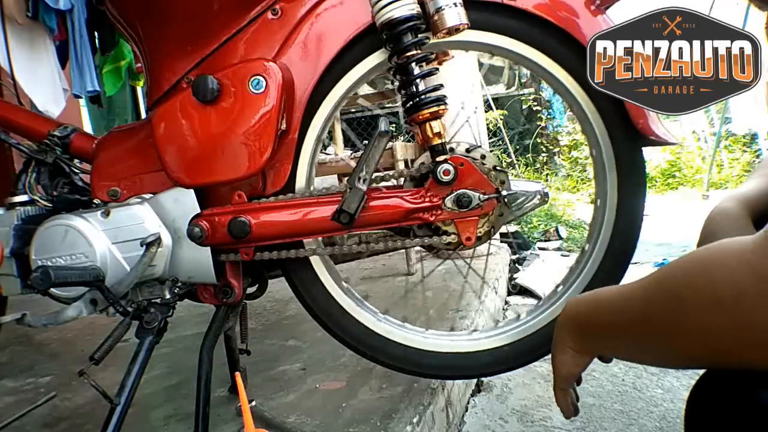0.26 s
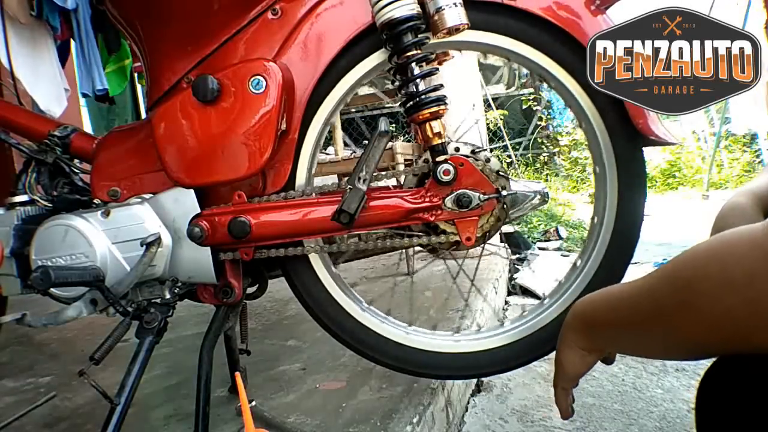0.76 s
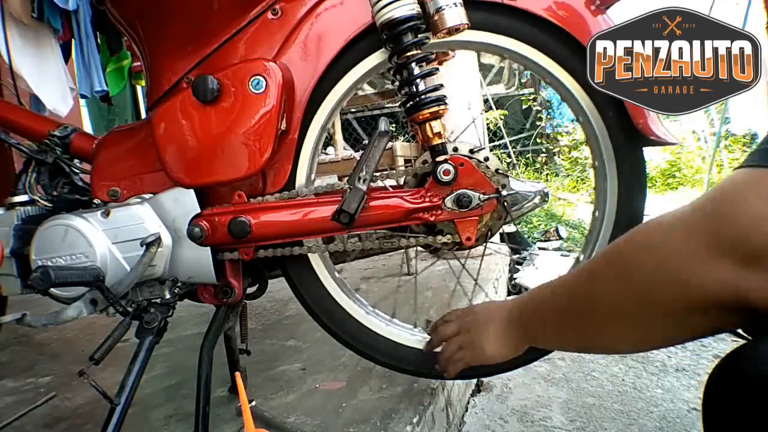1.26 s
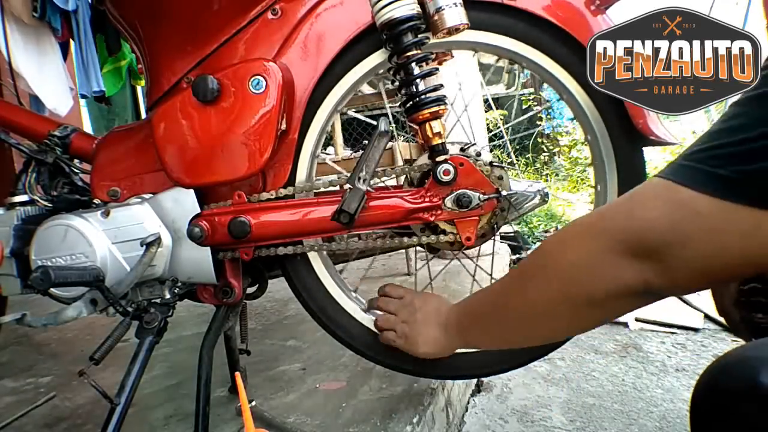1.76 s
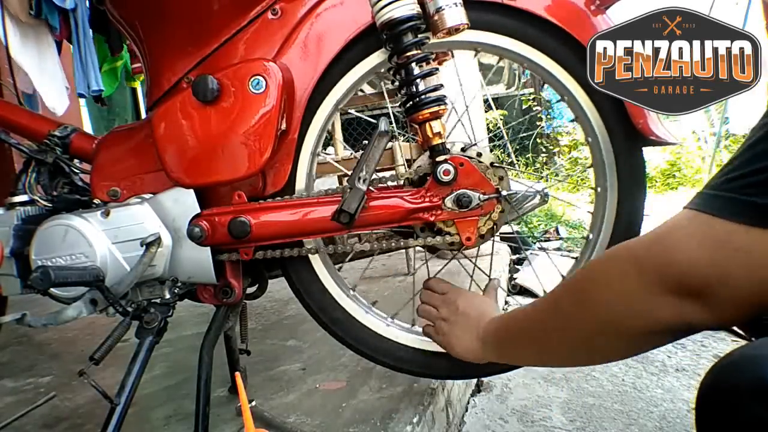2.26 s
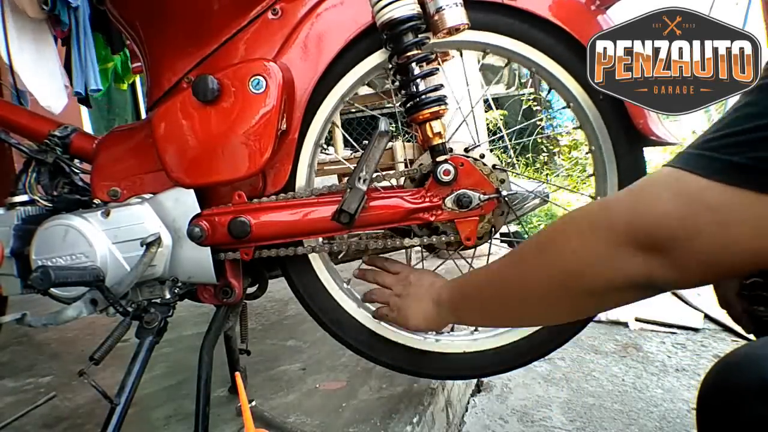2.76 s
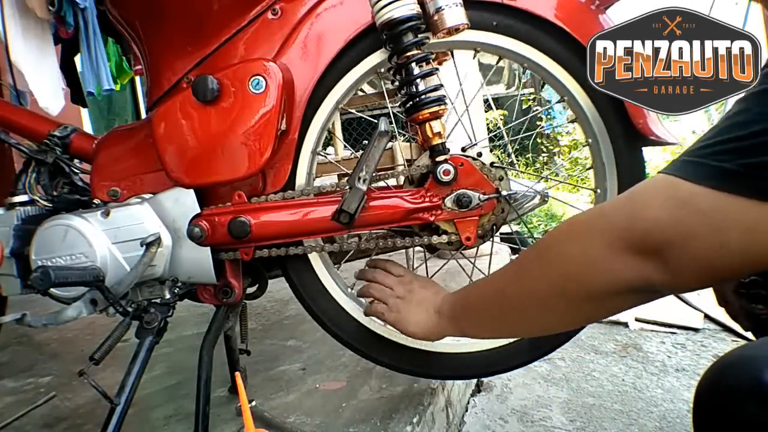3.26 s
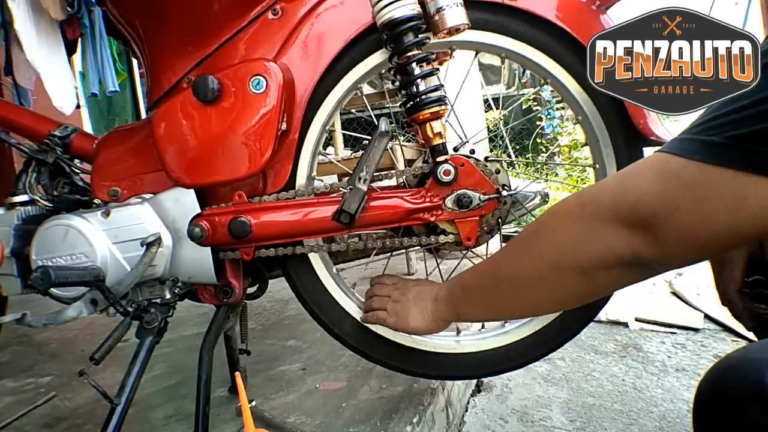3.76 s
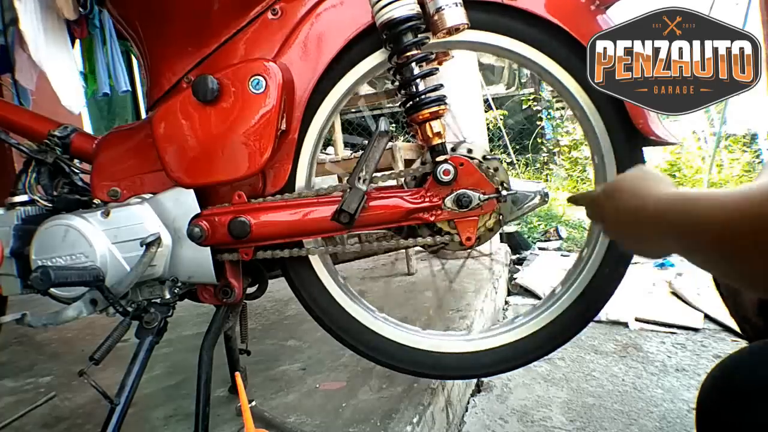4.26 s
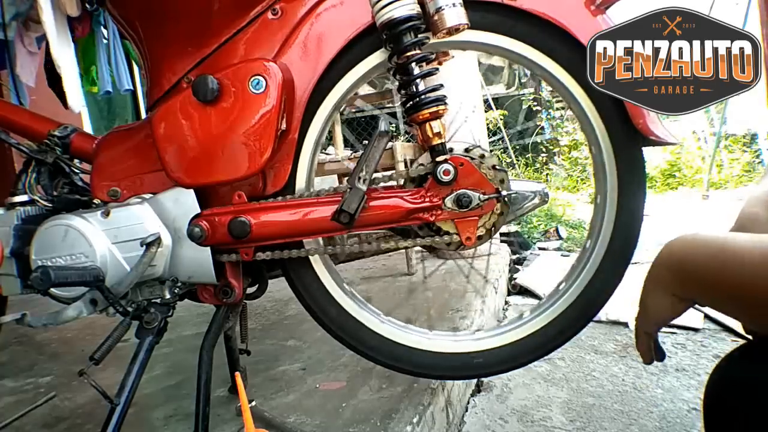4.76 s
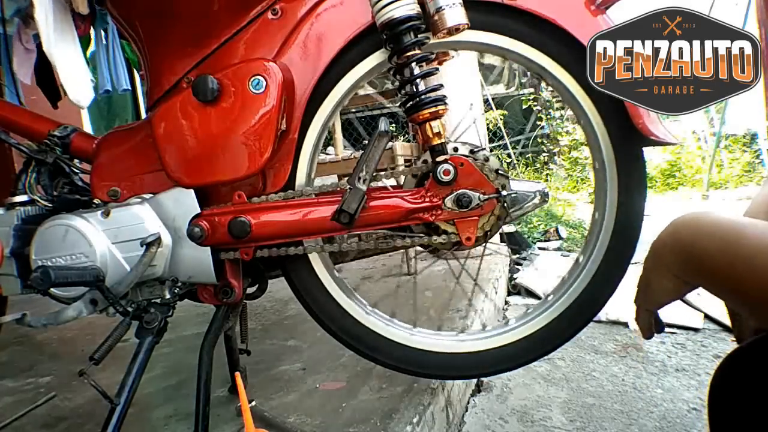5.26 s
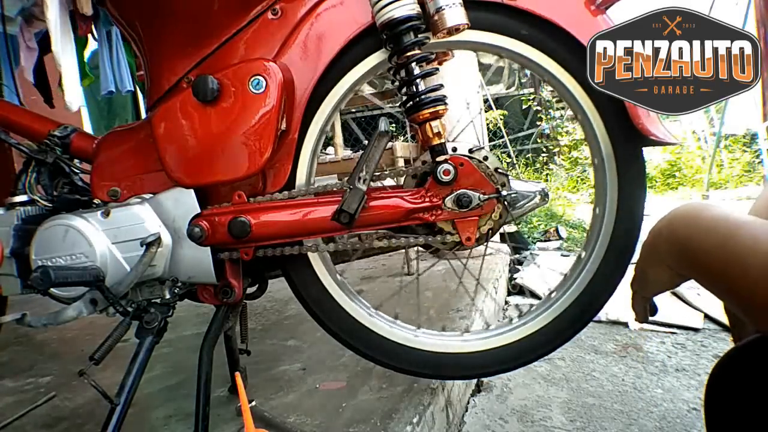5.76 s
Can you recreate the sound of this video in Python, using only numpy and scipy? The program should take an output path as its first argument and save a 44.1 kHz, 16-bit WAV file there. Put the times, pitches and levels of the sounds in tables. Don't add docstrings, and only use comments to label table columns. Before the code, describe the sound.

Hand-turned motorcycle wheel: light chain knocks and ticks, three loud bright snaps, a brief low wind gust, then denser clinking under an open roof.

```python
import sys
import numpy as np
from scipy import signal
from scipy.fft import rfft, irfft
from scipy.io import wavfile
from scipy.ndimage import uniform_filter1d

SR = 44100
rng = np.random.default_rng(int(sys.argv[2]) if len(sys.argv) > 2 else 0)


def materialize(psi):
    bounded = np.clip(np.atleast_2d(psi).T, -1, 1)
    quanta = np.round(bounded * 32767).astype(np.int16)
    wavfile.write(sys.argv[1], SR, quanta)


def level_to_linear(level):
    exponent = np.asarray(level, float) / 20
    return 10 ** exponent


N = 265923
SECONDS = np.arange(N) / SR
GRID_HZ = np.maximum(np.arange(2049) * SR / 4096, 1)
SIDES = np.array([[.5], [-.5]])
PATHS = np.array([[.5], [-.5], [0]])

# (frequency [Hz], level [dB], decay T60 [s])
GUARD_MODES = [(597.4, 5, 0.12), (683, -1.5, 0.1), (791, 8.5, 0.16), (950, -2, 0.1), (1034, -2.5, 0.011),
               (1150, 8.5, 0.085), (1061, 8.5, 0.077), (1370, -12.5, 0.0052), (1338, 4, 0.12),
               (1474, 9.5, 0.063), (1230, -6, 0.044)]
# (frequency [Hz], level [dB], decay T60 [s])
ARM_MODES = [(1720, 1.5, 0.026), (1820, -4, 0.126), (2085, 3.5, 0.041), (2225, -16.5, 0.082),
             (2270, -0.5, 0.01), (2900, -16.5, 0.042), (2910, -2, 0.068), (3240, -2, 0.033),
             (3870, -7, 0.018), (4920, -10.5, 0.0072)]


def rms_one(x):
    return x / np.sqrt(np.mean(x ** 2) + 1e-20)


def in_time(rows):
    s, level = np.transpose(rows)
    return np.interp(SECONDS, s, level)


def at_hz(points, hz):
    table_hz, values = np.array(points).T
    return np.interp(np.log(hz), np.log(table_hz), values)


def band(x, low_hz, high_hz):
    return signal.sosfilt(signal.butter(2, [low_hz, high_hz], "band", fs=SR, output="sos"), x)


def drift(rate):
    r = np.exp(-80 * np.pi * rate / SR)
    white = rng.standard_normal(N // 40 + 2002)
    slow = signal.lfilter([1], [1, -2 * r, r * r], white)[2000:]
    return np.interp(np.arange(N) / 40, np.arange(len(slow)), rms_one(slow))


def swells(rows, rest_db, rise_db_per_s, fall_db_per_s):
    start, held, db = np.transpose(rows)[:, :, None]
    before = np.maximum(start - SECONDS, 0)
    after = np.maximum(SECONDS - start - held, 0)
    level = db - rise_db_per_s * before - fall_db_per_s * after
    return np.maximum(level.max(axis=0), rest_db)


def add(out, s, sound):
    i = max(round(s * SR), 0)
    out[:, i:i + sound.shape[1]] += sound[:, :N - i]


def causal(db):
    fold = irfft(db * np.log(10) / 20, axis=-1)
    fold[..., 1:2048] *= 2
    fold[..., 2049:] = 0
    return irfft(np.exp(rfft(fold, axis=-1)), axis=-1)


def strike(colour_db, peak_db, pan_db, rattle_ms, per_s, rise_ms):
    # (frequency [Hz], left-right difference [dB])
    port_bias = [(700, -1), (1300, -1), (2400, -10), (4400, -7), (8300, -9), (11000, -1), (15000, -4)]
    right_lag = 4.7
    ms = np.arange(2400) * 1000 / SR
    swell = (1 - np.exp(-ms / rise_ms)) * np.exp(-ms / max(rattle_ms, .3))
    chance = rng.random((3, len(ms)))
    touching = (chance[0] < per_s / SR) * swell
    left = touching * (2 * chance[1] - 1)
    right = left + .6 * touching * (2 * chance[2] - 1)
    first = round(rise_ms * SR / 2000)
    left[first] = right[first] = .4
    lag = np.exp(-2j * np.pi * np.arange(1201) / len(ms) * right_lag)
    contacts = np.array([left, irfft(rfft(right) * lag), 1.0 * (ms == 0)])
    power = uniform_filter1d(np.abs(rfft(contacts, 4096)) ** 2, size=15)
    ripple_db = 10 * np.log10(power + 1e-9)
    rings = causal(colour_db - ripple_db + PATHS * at_hz(port_bias, GRID_HZ))
    sound = signal.fftconvolve(rings, contacts, axes=1)
    sound = sound / np.sqrt(np.mean(sound ** 2, axis=1, keepdims=True))
    return sound * level_to_linear(peak_db + pan_db * PATHS) / np.abs(sound[:2]).max()


def engine_db():
    # (start [s], held [s], level [dB])
    loads = [
        (-.02, 0.015, -41),
        (.27, 0.25, -47),
        (.7, 0.0091, -53.5),
        (.85, 0.0065, -48.5),
        (1.01, 0.42, -40),
        (1.9, 0.0058, -52),
        (2.12, 0.03, -59),
    ]
    return swells(loads, rest_db=-67.5, rise_db_per_s=279, fall_db_per_s=152)


def drone():
    order_hz, shift_s, shift_hz = 89.8, 1.9, 22
    hz = order_hz + shift_hz * (SECONDS > shift_s)
    phase = 2 * np.pi * np.cumsum(hz) / SR + 0.65 * drift(3.7)
    return np.sqrt(2) * np.sin(phase) * level_to_linear(engine_db() + 0.63 * drift(41) + SIDES * 4.5)


def knocks():
    # (time [s], peak [dB], arm ring [dB], rattle [ms])
    front = [(0.001, -25.5, -8, 7.8), (0.01, -56, -17, 4), (0.189, -37, -10, 6.7), (0.759, -44.5, -27, 3.5),
             (0.806, -32, -8.5, 9.1), (1.743, -39.5, -10.5, 20), (2.469, -54.5, -37, 4.3),
             (4.154, -31.5, -7, 10.8), (4.165, -39.5, -19, 5.7), (4.241, -43, -11, 12),
             (4.41, -33.5, -6, 5.3), (4.453, -45, -19, 5.2), (4.466, -40, -12, 11), (4.535, -59, -26, 8),
             (4.609, -27.5, -9, 3.7), (4.619, -36.5, -22, 12), (5.134, -25.5, -6.5, 3.6),
             (5.311, -24, -5, 2.3), (5.32, -33.5, -35, 8.5), (5.52, -46, -6.5, 17)]
    # (time [s], peak [dB], arm ring [dB], rattle [ms])
    middle = [(0.109, -40.5, -7.5, 63), (0.177, -32.5, -11, 1.9), (0.387, -43, -19, 5.5),
              (0.427, -55, -38, 4.6), (0.945, -51, -12, 6.6), (1.288, -37.5, -19.5, 6.7),
              (1.303, -46.5, -16, 12), (1.855, -42, -13, 18), (2.885, -52, -13, 50), (4.11, -47, -14, 11),
              (4.299, -44, -21, 3.2), (4.306, -45, -20, 8.6), (4.325, -46.5, -15, 9.1),
              (4.382, -48, -17, 9.5), (4.734, -44.5, -23, 5), (5.707, -45, -10, 22)]
    # (time [s], peak [dB], arm ring [dB], rattle [ms])
    rear = [
        (1.36, -55, -18, 9.8),
        (2.08, -52.5, -20, 7.3),
        (4.788, -43, -19.5, 7.2),
        (4.887, -36.5, -9.5, 3.4),
        (4.947, -49.5, -30, 11),
        (5.638, -49, -15, 16),
    ]
    # (time [s], peak [dB], arm ring [dB], rattle [ms])
    bracket = [(0.504, -46.5, -8.5, 17), (0.574, -35, -15, 7), (0.735, -40, -43, 8), (1.438, -42, -10, 5.9),
               (1.53, -37.5, -14, 5.7), (3.88, -47.5, -11.5, 17), (3.979, -33, -14.5, 13.5),
               (4.553, -35.5, -5, 8.4), (5.078, -33.5, -7, 19), (5.247, -33, -8.5, 5),
               (5.868, -41.5, -39, 4.7), (5.937, -39.5, -15, 11)]
    # rows, colour centre [Hz], left-right [dB], loss one octave off the centre [dB]
    places = [(front, 918, -6, 19), (middle, 698, -6, 19), (rear, 560, -7.5, 19), (bracket, 1180, -2, 75)]
    guard_hz, guard_db, guard_t60 = np.transpose(GUARD_MODES)
    arm_hz, arm_db, arm_t60 = np.transpose(ARM_MODES)
    mode_hz = np.r_[guard_hz, arm_hz]
    width_hz = 2.9 / (np.r_[guard_t60, arm_t60] * 0.68)
    out = np.zeros((3, N))
    for rows, centre_hz, pan_db, focus_db in places:
        placed_db = guard_db - focus_db * np.log2(guard_hz / centre_hz) ** 2
        for s, peak_db, upper_db, rattle_ms in rows:
            chance = rng.standard_normal((2, len(mode_hz)))
            mode_db = np.r_[placed_db, arm_db + upper_db + 3] + 2 * chance[0]
            off = (GRID_HZ[:, None] - mode_hz * (1 + .005 * chance[1])) / width_hz
            power = (level_to_linear(2 * mode_db) / (1 + off ** 2) ** 1.6).sum(axis=1) + 1e-7
            colour_db = 10 * np.log10(power)
            add(out, s, strike(colour_db, peak_db + 4.0, pan_db, rattle_ms, per_s=2100, rise_ms=2.2))
    return out


def ticks(rows, pan_db, rattle_ms):
    out = np.zeros((3, N))
    for s, peak_db, low_db, upper_db, top_db in rows:
        tilt = [(1500, low_db - 24), (3400, low_db + 18.0), (5200, low_db + 16.0), (8800, 0.008),
                (11200, upper_db), (14000, top_db), (16000, top_db - 11.5)]
        tooth_db = 3.5 * rng.standard_normal(24)
        patches = np.interp(GRID_HZ, np.linspace(0, SR / 2, 24), tooth_db)
        colour_db = at_hz(tilt, GRID_HZ) + patches
        add(out, s, strike(colour_db, peak_db + 9, pan_db, rattle_ms, per_s=7300, rise_ms=0.076 * rattle_ms))
    return out


def chatters():
    # (time [s], peak [dB], low ring [dB], upper ring [dB], top ring [dB])
    chatter_rows = [(0.0024, -42, -8, 25, 1), (0.1084, -45, -8, 4, 6), (0.1697, -40, -16, 0, 7.5),
                    (0.5734, -42.5, -15, 0, -7.5), (0.943, -53.5, -8, 4, -5), (1.5294, -45.5, 4, 4, 4),
                    (1.7293, -34, -6, 15, 17.5), (3.9756, -41, -11.5, 12.5, 0), (4.1016, -51, -14, 0, 8),
                    (4.13, -52, -15, 5, -2), (4.1737, -37, -22, 2.5, 3), (4.2142, -41.5, -26, -3, 0),
                    (4.5522, -39, -8, 12, -3), (4.5744, -44.5, -15, 6, -9), (4.6069, -37.5, -7.5, 10, -15),
                    (4.645, -50, -22, 12, -12), (5.1312, -43.5, -8.5, 18, -7), (5.243, -37.5, -18, 10, -7),
                    (5.3078, -33.5, -11.5, 9, 2)]
    return ticks(chatter_rows, pan_db=-5, rattle_ms=11)


def seats():
    # (time [s], peak [dB], low ring [dB], upper ring [dB], top ring [dB])
    seat_rows = [(0.0407, -36, -28, 15, 24), (0.36, -44, -6, 18, 24), (0.4844, -51.5, -3, 13, 19),
                 (0.7937, -62, -14, 5, 10), (0.8086, -43.5, -15, 16, 2), (0.8227, -37.5, -28, 17, 16),
                 (0.8644, -51.5, -18, 0, 3), (1.438, -52, -9, 1, 2.5), (1.568, -52, -27, 10, 20),
                 (1.6053, -43, -43, 10, 16), (1.782, -48, -9, 12, 24), (1.9597, -50.5, -19, 2, 10),
                 (2.1171, -34, -22, -3, 9), (2.822, -59, -25, 7, 11), (3.213, -48.5, -25, 10, 18),
                 (3.7913, -48.5, -16, 18.5, 12.5), (4.0422, -52, -10.5, -11, -23),
                 (4.1536, -32.5, -11, 2, 2), (4.3044, -53, -28, 3, -8), (4.345, -41.5, -22, 8, -10),
                 (4.3557, -39, -22, 1, -6), (4.3823, -38, -29, 14, 19), (4.4154, -40, -16, -2, 26),
                 (4.438, -44, -5, 5, 28), (4.5603, -55, -15, 8, -4), (4.8436, -55, -23, 7, 14),
                 (4.885, -34.5, -19.5, -1, -5), (4.9044, -35.5, -22, 5, 14), (4.9758, -51, -22, 3, 8),
                 (5.1088, -51, 13, 6, 3), (5.2568, -45, -14, 1, -8), (5.349, -42.5, -17, 6, 2),
                 (5.386, -44, -19, 2, 12), (5.413, -60, -29, 5, 22), (5.4899, -47.5, -22, 16, 22),
                 (5.683, -51.5, -9, 14, 19), (5.972, -50, -7, 10, 20)]
    return ticks(seat_rows, pan_db=-8.5, rattle_ms=4.6)


def slack():
    # (time [s], level [dB])
    slack_level = [(0, -58), (.3, -76.5), (.9, -67), (1.9, -70.5), (2.3, -81.5), (3.8, -70), (4.0, -62.5),
                   (4.45, -61), (5.0, -62), (5.4, -67), (6.03, -65.5)]
    sizes = level_to_linear(4.5 * rng.exponential(size=N).clip(0, 2.5)) * rng.choice([-1, 1], N)
    touches = sizes * (rng.random(N) < 260 * level_to_linear(6 * drift(9)) / SR)
    dealt = rng.integers(0, 3, N)
    out = 0
    for k, (hz, db, t60) in enumerate([*GUARD_MODES, *ARM_MODES]):
        r, w = level_to_linear(-60 / (.3 * t60 * SR)), 2 * np.pi * hz / SR
        pushes = touches * (dealt == k % 3) + 1e-18
        ring = signal.lfilter([0, np.sin(w)], [1, -2 * r * np.cos(w), r * r], pushes)
        out = out + level_to_linear(db - 15 * (hz > 1600)) * ring
    return rms_one(band(out, 370, 6040)) * level_to_linear(in_time(slack_level)) * np.ones((3, 1))


def rub():
    # (time [s], level [dB])
    rub_level = [(0, -57.5), (.3, -68), (1.9, -71.5), (3.9, -89.5), (4.0, -56), (4.12, -61.5), (4.2, -48.5),
                 (4.32, -60), (4.4, -50.5), (4.5, -71), (4.66, -52), (4.75, -77), (4.92, -79), (5.05, -84),
                 (5.35, -50), (5.45, -74), (6.03, -70)]
    sizes = level_to_linear(3.5 * rng.exponential(size=(2, N)).clip(0, 3)) * rng.choice([-1, 1], (2, N))
    grains = sizes * (rng.random(N) < 2800 * level_to_linear(3 * drift(20)) / SR)
    crackle = rms_one(band(band(grains, 5300, 12400), 4000, 14000))
    return crackle * level_to_linear(in_time(rub_level) + SIDES * -4)


def roof(x):
    # (frequency [Hz], T60 [s])
    roof_t60 = [(500, 0.18), (1500, 0.15), (4000, 0.12), (6000, 0.23), (9000, 0.23), (12000, 0.105),
                (15000, 0.1)]
    # (frequency [Hz], level [dB])
    roof_level = [(500, -1), (1500, 3), (4000, -3.5), (6000, -2.5), (9000, -1), (12000, -7.5),
                  (15000, -8.5)]
    # (frequency [Hz], left-right difference [dB])
    roof_balance = [(500, 3.5), (1500, -3), (2500, -10), (4400, -6), (5500, -2), (8000, -4), (10500, 7),
                    (15000, -9.5)]
    # (frequency [Hz], level relative to the first echoes [dB])
    far_walls = [(500, -34.5), (3000, -17), (6000, -33), (9000, -21.5), (12000, -6), (15000, 8)]
    far_t60_s, far_end_s, far_fade_s = 0.43, 0.099, .03
    t, edges = np.arange(12000) / SR, 400 * 2 ** (np.arange(17) / 3)
    onset = np.clip((t - .003) / 0.0015, 0, 1)
    leaving = np.clip((far_end_s - t) / far_fade_s + 1, 0, 1)
    white, echoes = rng.standard_normal((2, 2, len(t))), 0
    for k, (low, high) in enumerate(zip(edges, edges[1:])):
        hz = np.sqrt(low * high)
        early = level_to_linear(-60 * t / at_hz(roof_t60, hz))
        late = level_to_linear(at_hz(far_walls, hz) - 60 * t / far_t60_s) * leaving
        fade = (early + late) * onset
        gain = level_to_linear(at_hz(roof_level, hz) + SIDES * at_hz(roof_balance, hz)) / np.sqrt(np.sum(fade ** 2))
        echoes = echoes + band(white[k % 2], low, high) * fade * gain
    return signal.fftconvolve(x[None], echoes, axes=1)[:, :N]


def rumble():
    # (start [s], held [s], level [dB])
    shakes = [
        (2.12, 0.054, -48),
        (3.2, 0.44, -63.5),
        (3.62, 0.11, -51.5),
        (4.3, 0.23, -52),
    ]
    rest_db = -58.5
    shaken_db = swells(shakes, rest_db, rise_db_per_s=205.5, fall_db_per_s=205.5)
    low_db = np.maximum(shaken_db, engine_db() - 6)
    shared, own = rng.standard_normal(N), rng.standard_normal((2, N))
    air = (shared + .45 * own) * level_to_linear(2.0 * drift(14))
    deep = rms_one(band(band(air, 55, 99), 25, 89.5)) * level_to_linear(low_db - 3.0)
    breeze_db = -62.5 + 0.65 * (low_db - rest_db)
    upper = rms_one(band(air, 93.0, 199)) * level_to_linear(breeze_db)
    return (deep + upper) * level_to_linear(SIDES * 4.6)


def yard():
    # (time [s], level [dB])
    yard_level = [(0, -62.5), (1.5, -63), (2.5, -63.5), (3.3, -64), (3.9, -63.5), (4.3, -60), (6.03, -60.5)]
    # (frequency [Hz], density [dB per Hz])
    yard_spectrum = [(35, -59.5), (60, -7.5), (103, -20), (176, -3.5), (268, -8.5), (437, -9.5), (492, -7),
                     (749, -10), (1820, -14), (2250, -16), (4030, -22), (6280, -27.5), (11300, -24),
                     (14200, -24.5), (16000, -46)]
    # (frequency [Hz], correlation [-1 to 1])
    likeness = [(60, 0.7), (130, 0.2), (290, 0.7), (640, 0.8), (1410, -0.081), (3100, 0.1), (6820, 0.1),
                (15000, 0.5)]
    # (frequency [Hz], left-right difference [dB])
    yard_balance = [(60, 0.5), (110, -1.5), (200, 7), (380, 3), (700, 1), (1290, -5), (2380, -6.5),
                    (4400, -9.5), (8120, -5.5), (15000, -2)]
    out, edges = 0, 50 * 2 ** (np.arange(26) / 3)
    white = rng.standard_normal((2, 2, N))
    for k, (low, high) in enumerate(zip(edges, edges[1:])):
        mid, side = band(white[k % 2], low, high)
        hz = np.sqrt(low * high)
        alike = np.clip(at_hz(likeness, hz), -.95, .95)
        gain = level_to_linear(at_hz(yard_spectrum, hz) + 1.2 * drift(22.0) + SIDES * at_hz(yard_balance, hz))
        out = out + gain * (np.sqrt(1 + alike) * mid + np.sqrt(1 - alike) * side * [[1], [-1]])
    middle_rms = np.sqrt(np.mean(band(out.mean(axis=0), 300, 3000) ** 2))
    return out / middle_rms * level_to_linear(in_time(yard_level))


def thin_top(x):
    below = signal.sosfilt(signal.cheby2(10, 40, 14500, fs=SR, output="sos"), x)
    edge = signal.sosfilt(signal.cheby2(6, 40, [13700, 14900], "band", fs=SR, output="sos"), x)
    return below + edge * uniform_filter1d((drift(8) > -.3) * 1., size=400)


def snaps():
    # (time [s], peak [dB], left-right [dB], rattle [ms], body under 4 kHz [dB])
    snap_rows = [
        (1.1284, -9, -9, 3.8, 6.5),
        (2.1523, -5.5, -9.5, 5.5, 3.5),
        (2.288, -11, -11.5, 4.5, 3),
    ]
    brightness = [
        -3.5,
        0.7,
        -1.5,
    ]
    # (frequency [Hz], density [dB per Hz])
    sprocket = [(1000, -49.5), (2000, -28.5), (2500, -18), (3000, -9), (4000, -9.5), (4750, -5), (5350, 4),
                (6400, -5.5), (7500, -3), (8400, -3), (9800, -1.5), (11800, 2), (14000, -4), (16000, -19)]
    # (frequency [Hz], width [Hz], level [dB])
    teeth = [(2740, 210, 5.5), (3100, 160, 8), (3610, 120, 8), (4040, 160, 5.5), (5250, 230, 10),
             (5700, 110, 4), (6070, 150, 1), (6860, 100, 0), (7680, 100, 5), (8450, 320, 10),
             (9500, 120, 3), (9960, 120, 2)]
    rings_db = sum(db / (1 + (2 * (GRID_HZ - hz) / width) ** 2) for hz, width, db in teeth)
    aimed = np.array([[1], [1], [.35]])
    plain_db = at_hz(sprocket, GRID_HZ) + rings_db * aimed
    body_shape = at_hz([(1800, 2.5), (2600, 1), (4300, 1), (5000, 0)], GRID_HZ)
    top_shape = at_hz([(8600, 0), (10000, 1)], GRID_HZ)
    out = np.zeros((3, N))
    for (s, peak_db, pan_db, rattle_ms, body_db), top_db in zip(snap_rows, brightness):
        colour_db = plain_db + body_db * body_shape + top_db * top_shape
        add(out, s, strike(colour_db, peak_db, pan_db, rattle_ms, per_s=14000, rise_ms=1.9))
    return out


def rebounds():
    # (time [s], peak [dB], low ring [dB], upper ring [dB], top ring [dB])
    rebound_rows = [
        (1.164, -49, 2, -5, -5),
        (1.208, -40, -30, 14, 13),
        (2.2515, -47, -30, 5, 24),
        (4.575, -52, -12, 8, -5),
        (5.655, -62, 5, -10, -12),
    ]
    return ticks(rebound_rows, pan_db=-8.5, rattle_ms=4.6)[:2]


def insects():
    # (time [s], level [dB])
    buzz_level = [(2.7, -85), (2.9, -67), (3.15, -67), (3.24, -66), (3.3, -90)]
    heard = (SECONDS > buzz_level[0][0]) * (SECONDS < buzz_level[-1][0])
    buzz = rms_one(band(rng.standard_normal((2, N)), 11350, 13500))
    return buzz * level_to_linear(in_time(buzz_level) - 1.5) * heard


def gust():
    # (time [s], peak [dB], frequency [Hz], length [ms])
    left_puffs = [(3.072, -35.5, 69.6, 7.4), (3.102, -28, 68, 8.1), (3.148, -32.5, 84.7, 19),
                  (3.180, -18.5, 106, 10.6), (3.205, -17, 129, 3.4), (3.229, -14.5, 100.3, 9.1),
                  (3.258, -11.5, 92.4, 3.7), (3.275, -23.5, 58.5, 17), (3.316, -19.5, 167, 2.6),
                  (3.335, -31, 136, 15), (3.355, -30.5, 63.6, 14), (3.400, -26.5, 191, 4.1),
                  (3.416, -18.5, 72.4, 3), (3.450, -38, 80, 9.8), (3.532, -45, 60, 9.8),
                  (3.580, -40, 55.4, 11)]
    # (time [s], peak [dB], frequency [Hz], length [ms])
    right_puffs = [
        (3.296, -33, 70.4, 10),
        (3.318, -40, 88, 19),
        (3.335, -28, 163, 0.9),
        (3.369, -47, 70, 14),
        (3.436, -26.5, 60.7, 4.5),
        (3.468, -39, 59.7, 8.3),
        (3.579, -42.5, 55, 8.1),
    ]
    out, t = np.zeros((2, N)), np.arange(-2400, 2400) / SR
    for port, puffs in enumerate((left_puffs, right_puffs)):
        for s, db, hz, ms in puffs:
            share = 0.37 * min(88 / hz, 1)
            turn = 2 * np.pi * hz * t + rng.uniform(-2.6, 1)
            flutter = rms_one(band(band(rng.standard_normal(len(t)), 1.4 * hz, 2.49 * hz), 70, 460))
            swing = np.cos(turn) + 1.14 * share * flutter * (1 + np.cos(turn)) / 2
            puff = level_to_linear(db) * swing * np.exp(-.5 * (t * 1000 / ms) ** 2)
            add(out[port:port + 1], s + t[0], puff[None])
    return signal.sosfilt(signal.butter(2, 28, "high", fs=SR, output="sos"), out)


def passing():
    # (time [s], level [dB])
    passing_level = [(3.8, -78.5), (4.1, -68), (4.7, -65), (5.0, -67), (5.2, -59), (5.48, -57), (5.7, -59),
                     (6.03, -77)]
    # (frequency [Hz], width [Hz], level [dB])
    vehicle_lines = [(194, 22, -0.4), (250, 30, -3.5), (322, 90, -3.5), (430, 130, -10)]
    white = rng.standard_normal(N) + 0.54 * rng.standard_normal((2, N))
    rings = 0
    for hz, width, db in vehicle_lines:
        ring = signal.lfilter(*signal.iirpeak(hz, hz / width, fs=SR), white)
        rings = rings + level_to_linear(db) * rms_one(ring)
    return rms_one(rings) * level_to_linear(in_time(passing_level) + 1.5 * drift(9) + SIDES * 4.0)


def narrow_notch(near, far):
    met = near + far * np.clip(.4 + .5 * drift(5), 0, 1.2)
    return near + far - .9 * signal.lfilter(*signal.iirpeak(4760, 16, fs=SR), met)


def scene():
    chain = knocks() + chatters() + seats() + slack() + snaps()
    near = chain[:2] + roof(chain[2]) + rub()
    far = thin_top(yard() + insects())
    return narrow_notch(near, far) + drone() + rumble() + rebounds() + gust() + passing()


def top_cut(x):
    return signal.sosfilt(signal.butter(12, 16500, fs=SR, output="sos"), x)


def record(dry):
    clipped = np.clip(dry, -.82, .82)
    mix = signal.sosfilt(signal.cheby2(10, 50, 16600, fs=SR, output="sos"), clipped)
    return top_cut(mix)


dry = scene()
out = record(dry)
materialize(out)
```